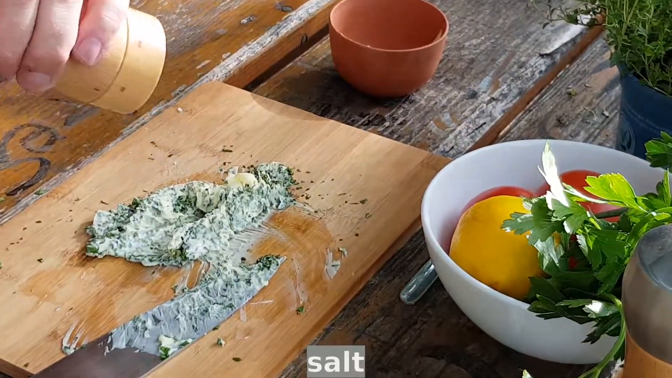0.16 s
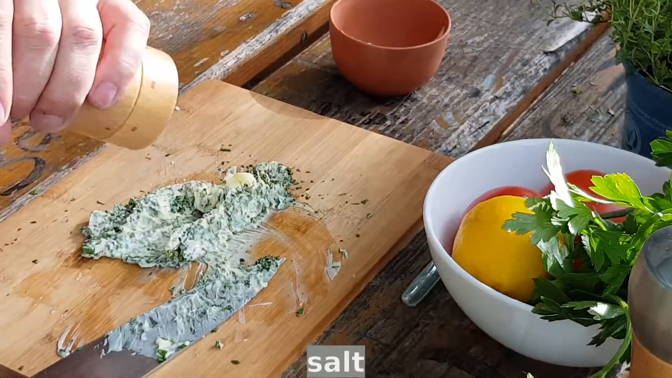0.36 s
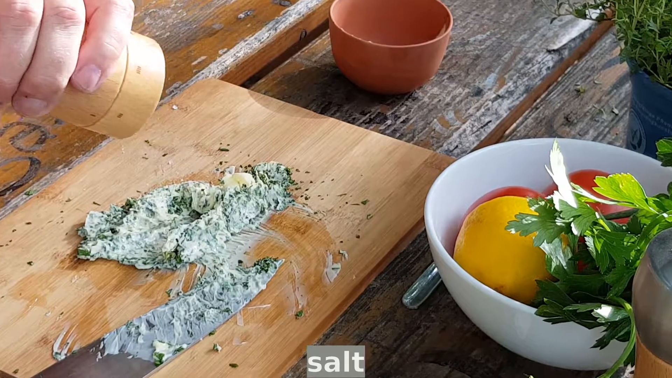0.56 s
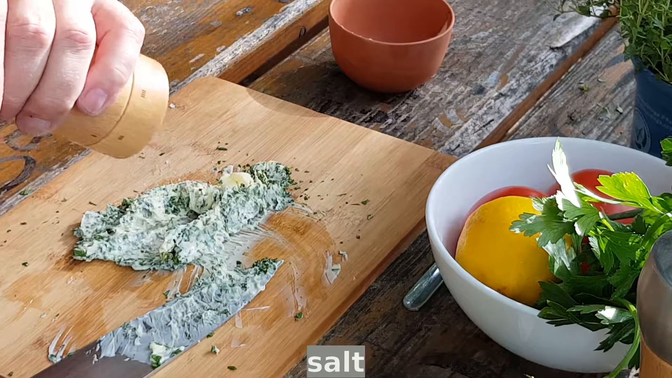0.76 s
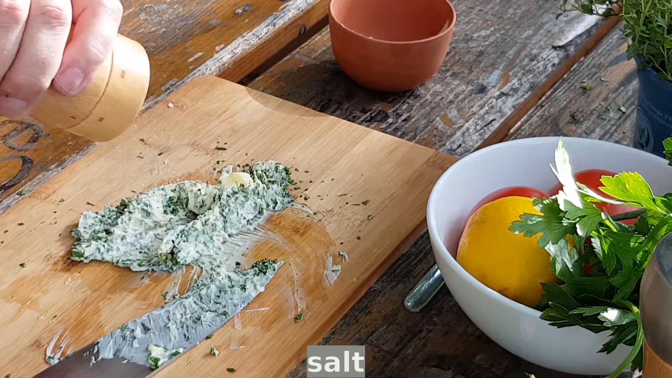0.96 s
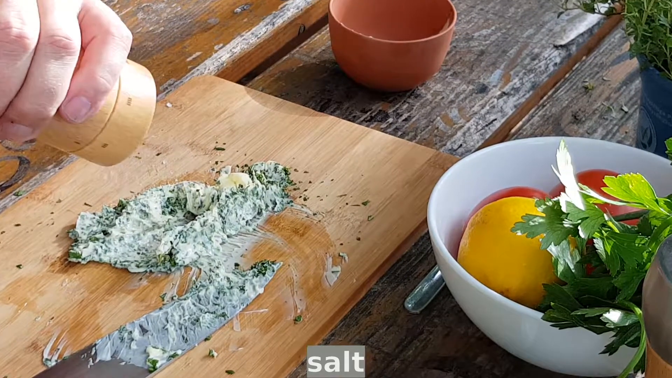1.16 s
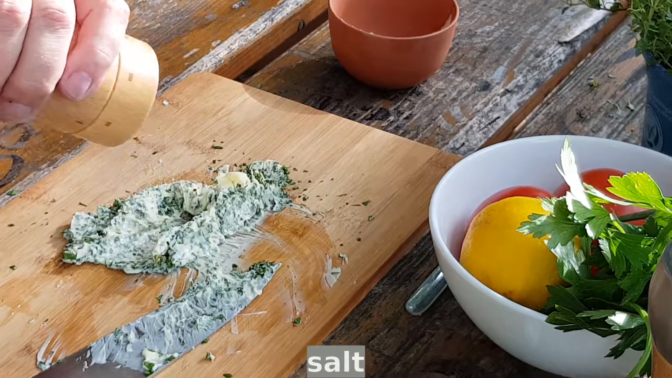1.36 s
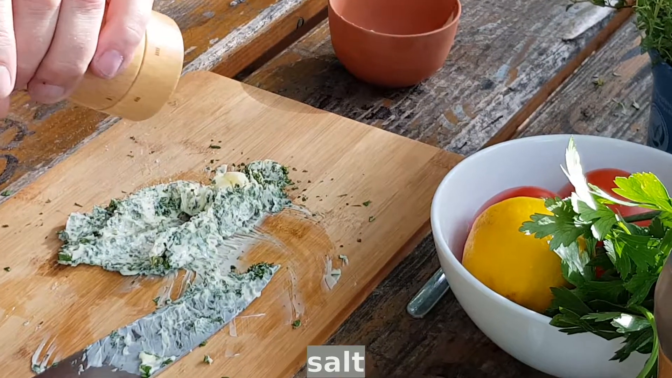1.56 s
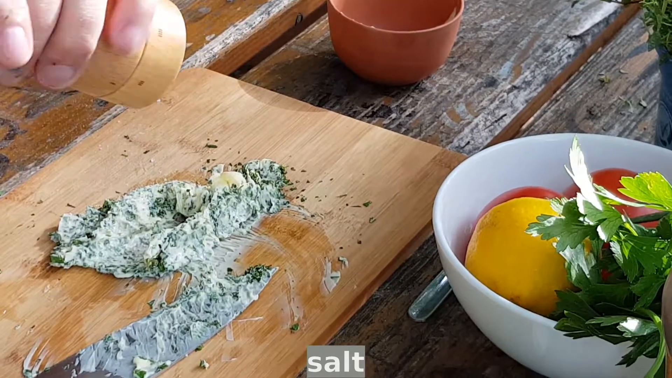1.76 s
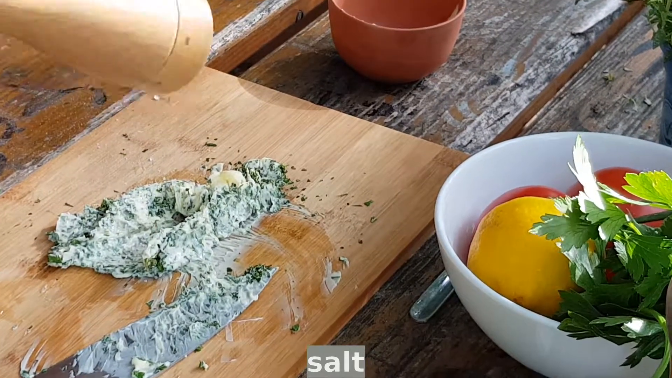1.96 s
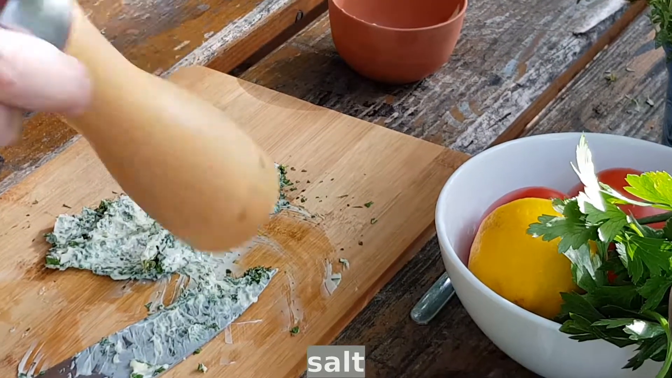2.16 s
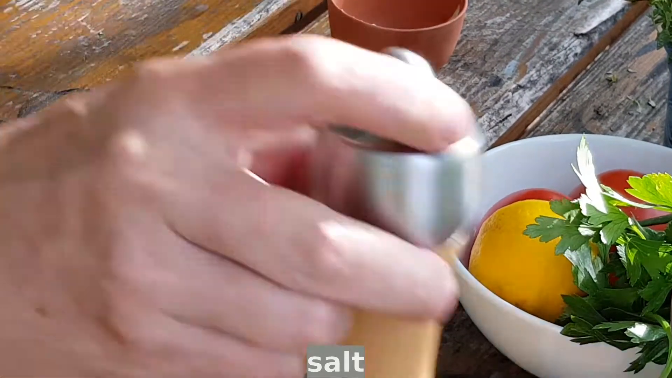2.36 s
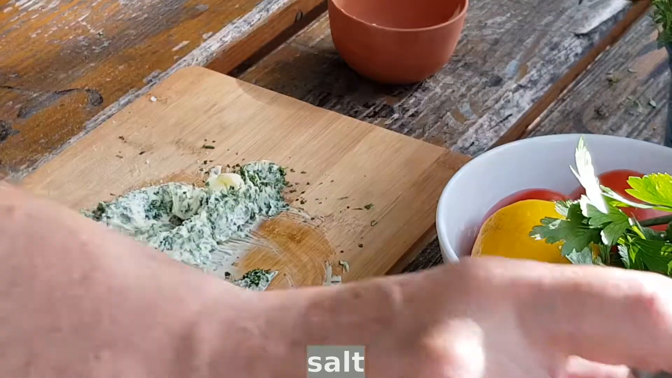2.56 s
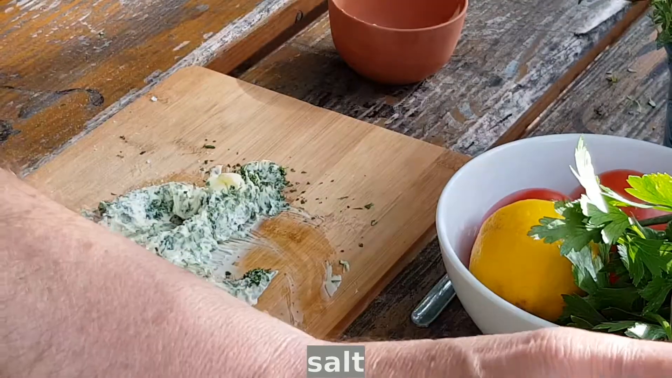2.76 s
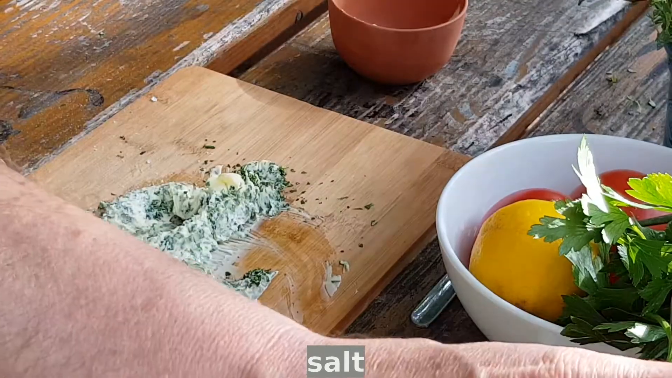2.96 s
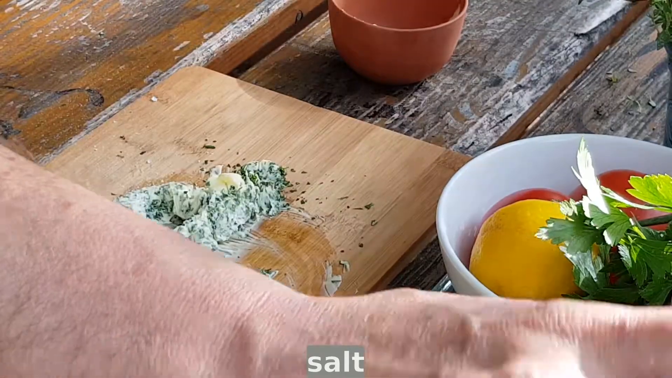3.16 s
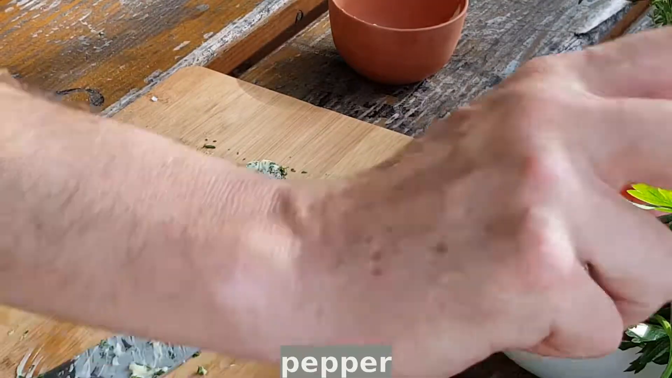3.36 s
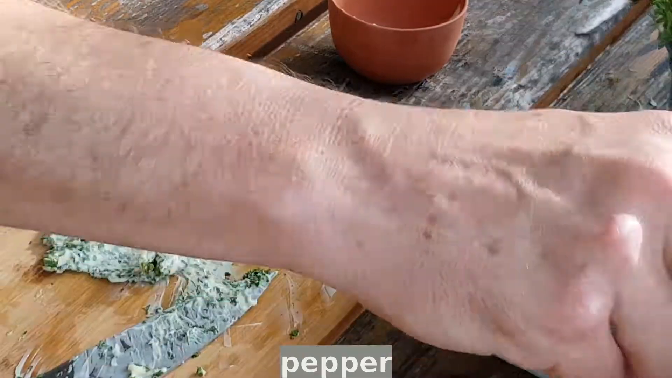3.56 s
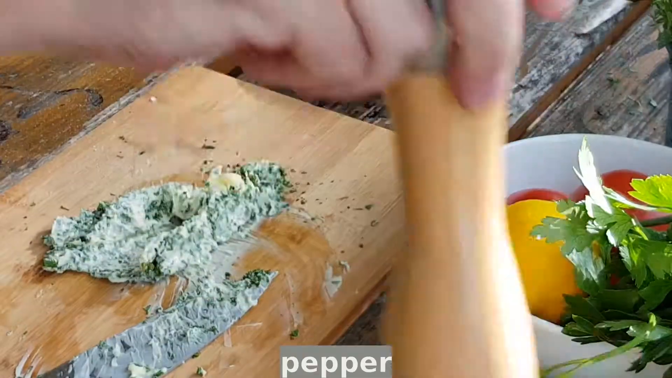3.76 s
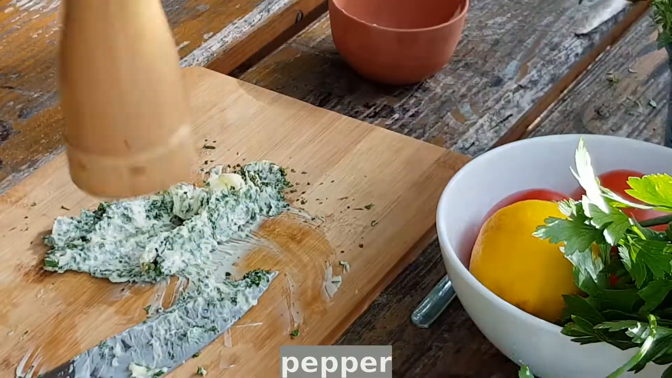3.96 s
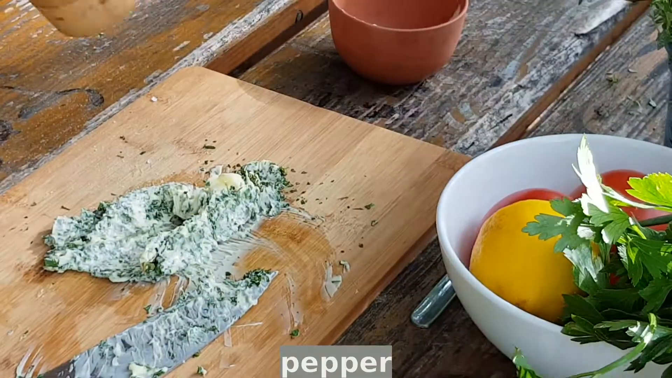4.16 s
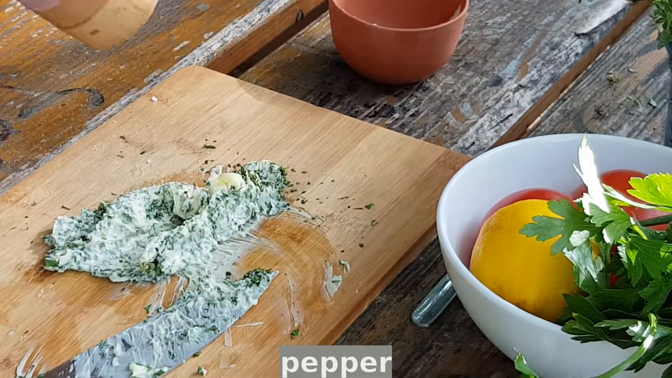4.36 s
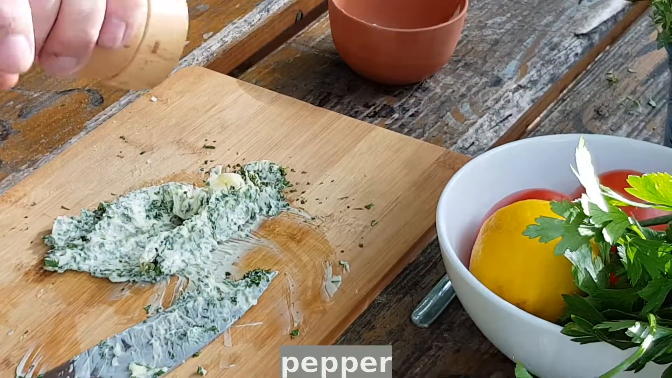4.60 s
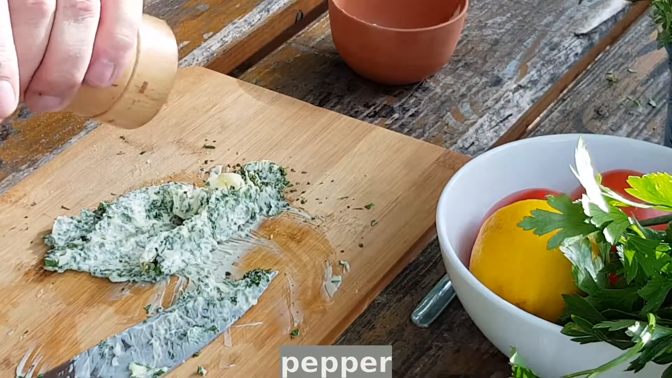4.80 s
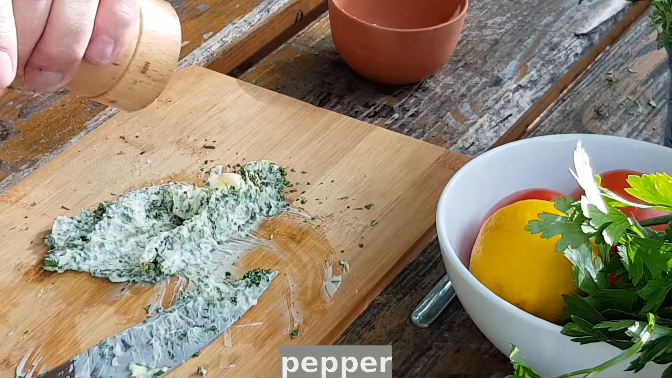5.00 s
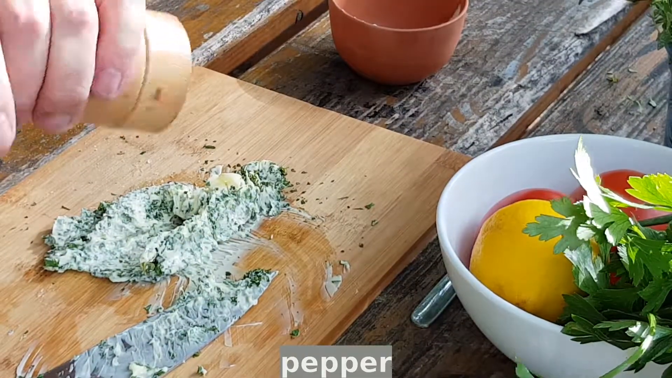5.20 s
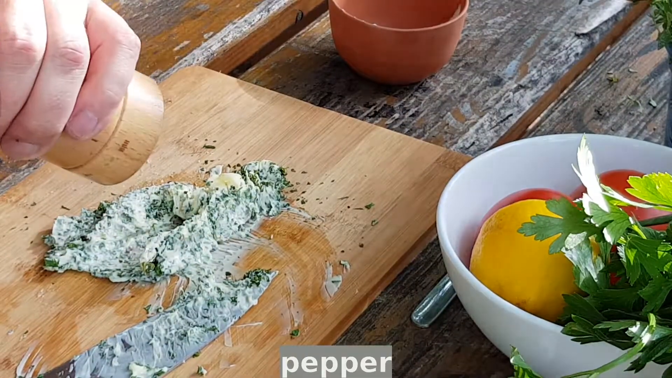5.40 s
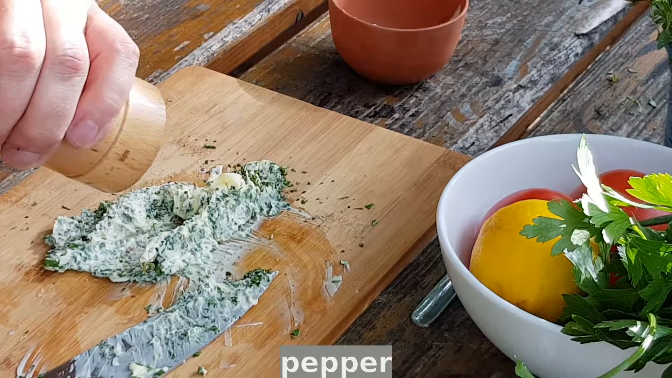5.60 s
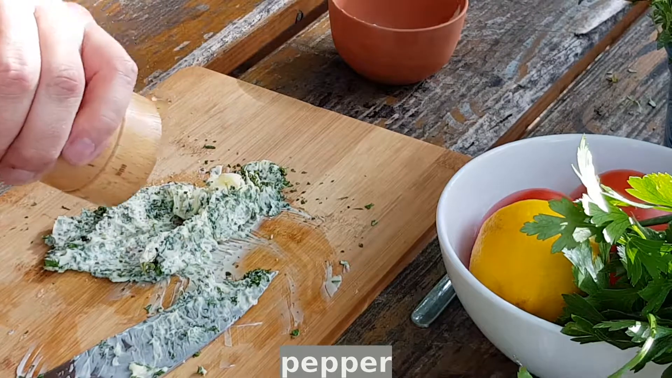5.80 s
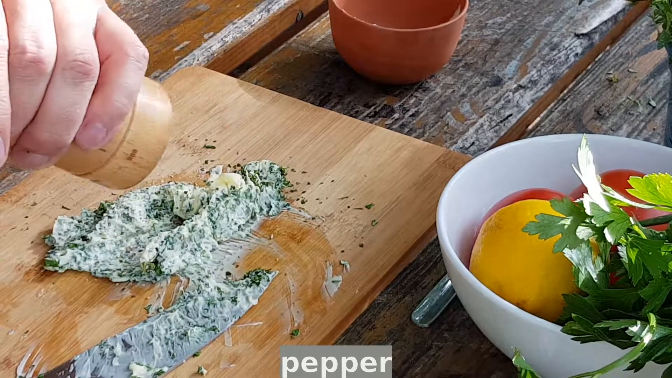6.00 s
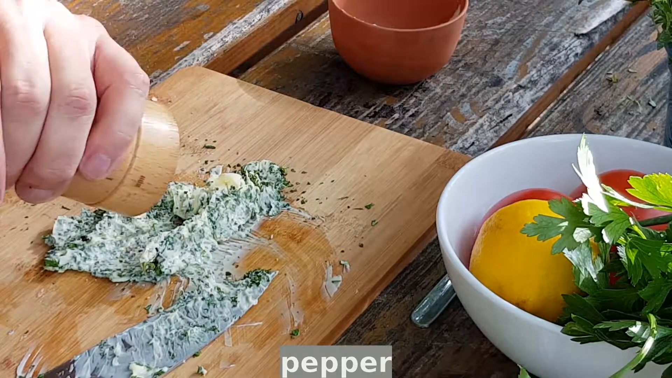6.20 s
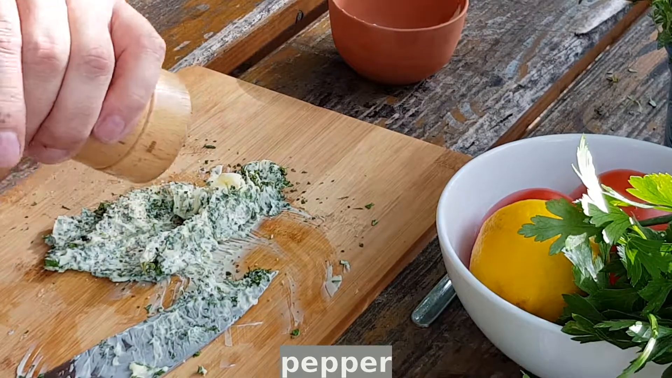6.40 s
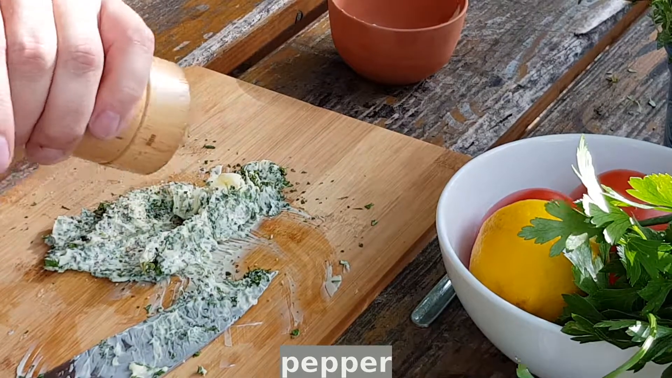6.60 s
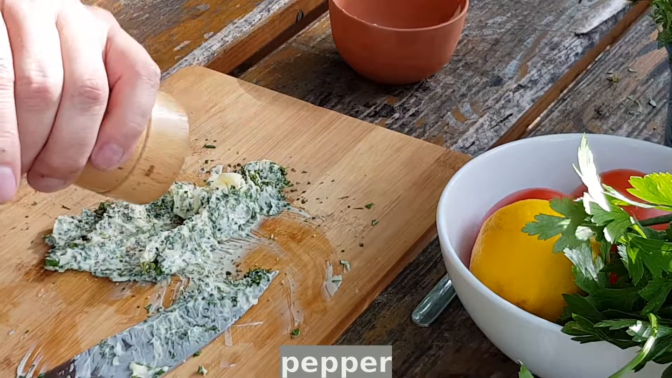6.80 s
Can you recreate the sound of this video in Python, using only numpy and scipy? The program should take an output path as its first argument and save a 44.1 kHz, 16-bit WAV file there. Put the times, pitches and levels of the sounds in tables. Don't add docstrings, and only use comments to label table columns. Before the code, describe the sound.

Close gritty grinding of salt, a wooden thud on a table, light cap ticks, then crackling pepper twists over soft wind and distant traffic.

```python
import sys
import numpy as np
from scipy import signal
from scipy.fft import rfft, irfft, next_fast_len
from scipy.io import wavfile
from scipy.ndimage import map_coordinates

SR = 44100
rng = np.random.default_rng(int(sys.argv[2]) if len(sys.argv) > 2 else 0)


def gain_from_decibels(decibels):
    exponent = np.asarray(decibels, float) / 20
    return 10 ** exponent


def int16_out(signal):
    q = np.round(np.clip(np.atleast_2d(signal).T, -1, 1) * 32767)
    wavfile.write(sys.argv[1], SR, q.astype(np.int16))


N = 302085
CLOCK = np.arange(0, N / SR + .002, .001)

SALT_IN_HAND, PEPPER_IN_HAND = (.05, 1.52), (4.47, 6.8)  # (first [s], last [s])
# (burrs bite [s], hold [s], effort [dB], sag of pressure over the hold [dB])
SALT_TWISTS = [
    (0.162, 0.084, -42, 4.5),
    (0.567, 0.098, -41.5, 10),
    (0.937, 0.12, -43, 5.5),
    (1.314, 0.1, -43, 3),
]
PEPPER_TWISTS = [
    (4.575, 0.07, -42.5, 20),
    (4.641, 0.046, -49.5, 6.5),
    (5.147, 0.086, -40.5, 4.5),
    (5.622, 0.093, -47.5, -5),
    (6.084, 0.067, -48.5, -6.5),
    (6.587, 0.075, -38, 14.5),
]
# (deep [dB over effort], middle [dB], upper body [dB])
SALT_GRIPS = [(0.2, 1.6, 1.5), (2.5, -1, 0.5), (-1, -1.5, 3), (1.5, 0.48, 1)]
PEPPER_GRIPS = [(-1.5, 5.5, 1.5), (3, 17, 10.5), (-3, 0, -1.5), (8.5, 3, -1.5), (9, 2, 4),
                (-2.5, 0.5, -2.5)]
SALT_SAG = (0.78, 0.67, 0.83, 1)
PEPPER_SAG = (0.11, 0.81, 0.83, 0.9)
# (deep [s], middle [s], upper body [s], grit [s])
SWELL_S = (0.0037, 0.001, 0.0052, 0.0016)
# (deep [dB], middle [dB], upper body [dB], grit [dB])
SETTLE_DB = (-16, -11.5, -11, -7)
SALT_WIND_UP, PEPPER_WIND_UP = 620, 650
LET_GO_DB_PER_S, SETTLE_DB_PER_S = 780, 262

# (time [s], grit peak [dB], deep, middle, upper body
# [dB above grit])
SALT_CRACKS = [(0.1135, -56, 2.0, 4, -11), (0.1287, -41, -6, -8, -7), (0.1323, -27.5, -17, -5, -8),
               (0.141, -49, 4, 8, -3), (0.1489, -49.5, 17, 13, 0), (0.1578, -30.0, -5.0, 6, -5),
               (0.1654, -36, 8, -3, -2), (0.1735, -35, 5, 2, -3), (0.1863, -45, 9, 9, 0),
               (0.1916, -38, 8, 2, -6), (0.203, -47, 4.0, 2, -2), (0.212, -47, 4, 3, -5),
               (0.2186, -39.5, 2, 4, 0), (0.2307, -34.5, -13, 3, -3), (0.2575, -40, -11, -7, 3),
               (0.5453, -39, 0, -3, -1), (0.552, -44.0, 6, -6, 7), (0.5752, -20.5, -15, -21, -19),
               (0.585, -44, -7, -3, 7), (0.5955, -40.5, 10, 5, 10), (0.6032, -45, 9, 5, 11),
               (0.608, -51, 12.0, 1, 5), (0.637, -45, 4, 1, 9), (0.658, -55, 4, 23, -3),
               (0.303, -62, 8, 1, 5),
               (0.904, -44, -18, -17, -10), (0.9278, -33, 5, -15, -9), (0.9387, -32.5, 6, -2, -10),
                    (0.9442, -37, 3, -4, 2), (0.955, -32, -9, -1, -3), (0.9607, -32, -12, 1, 0),
                    (0.9749, -25, -2, -2, 10), (0.9865, -44, -13, -4, 1), (0.9992, -37, 1, 0, -3),
                    (1.0075, -38, 3, 4, -1), (1.0106, -45, -4, 0, -1), (1.0188, -34, 4, 3, 4),
                    (1.0333, -39, 11, 11.5, 1), (1.051, -42, 12, 5, 7), (1.289, -42, -3, -12, -8),
                    (1.2958, -50, 0, 0, 0), (1.3085, -33.5, 2, -4, -2), (1.3252, -32.0, -12, -6, -7),
                    (1.3348, -24, -2, -2, 0), (1.3407, -34, 7.5, 5, 2), (1.3577, -33, 0, -2, -2),
                    (1.369, -34, 4, -2, 4), (1.377, -32, 7, 5, 12.5), (1.3897, -27.5, 6, 8.5, 11),
                    (1.4515, -46, 6, 11, -4)]
PEPPER_CRACKS = [(4.561, -59, 4, 3, 2), (4.5742, -30.5, 4, 10, 7), (4.5975, -52, 7.0, 3, 7),
                 (4.6135, -54, 4.0, 7, 4), (4.636, -49, 19, 7, 10), (4.6425, -47, 19.5, 20, 9),
                 (4.658, -45, 7, 23, 6), (4.665, -44, 13, 4, 5), (4.675, -45, 6, 12, 11),
                 (4.686, -49, -3, 1, 9), (4.6922, -45, 1, 2, 13), (4.7076, -50, 6.0, 20, 19),
                 (5.1105, -40.5, -3, 2, 8.5), (5.1394, -44, -2.0, -7, 10), (5.147, -27.5, 1, -8, 6),
                 (5.155, -36, 11, 4, 19.5), (5.1659, -26.5, -0.5, -3, 10), (5.178, -39, 14, 0, 3),
                 (5.191, -27, 2.5, -7, 1), (5.2017, -33, 2, -6, -2), (5.2114, -46, -4, -5, -7),
                 (5.2196, -48, -8, -11, -9), (5.2239, -49, -9, -7, -8), (5.2337, -34, 3.0, -9, -11),
                 (5.605, -40, -10, -10, -10), (5.6177, -44, 6, -11, -12), (5.6315, -22, -15, -16, -18),
                 (5.6464, -22.5, -5, -5, 0), (5.652, -27, -9, -8, 2), (5.665, -29, -1, -8, 2),
                 (5.681, -40, 16, 10, 2), (5.6916, -44, 15, 3, 4), (5.7007, -44.5, 3, -4, 17.5),
                 (5.7086, -55, 8, -1, 1),
                 (6.031, -52, 5, -7, 8), (6.0582, -45.5, 12.5, 7, 2), (6.066, -29.5, -4, -10, 8),
                      (6.076, -47, 16, 4, 9), (6.0863, -50, 11, 3, 20), (6.0981, -23, -17, -13, -5),
                      (6.1096, -21, -6, -15, -12), (6.1184, -45, 14, 0, 6), (6.1293, -26.5, -8, -3, -4),
                      (6.133, -37, -4, -5, 3), (6.1381, -31, -7, 1, 7), (6.1462, -24, -12, 1, 10.5),
                      (6.1552, -25.5, -11, 0, 10.5), (6.161, -39, -2, 2, 16.5), (6.5555, -43, 1.0, -2, 11),
                      (6.5726, -30, -4, -10, -11), (6.5823, -38, -2, 0, 2), (6.5874, -29, -7, -5, 16.5),
                      (6.6, -29, -6, -8, 6), (6.6074, -32, -2, -2, 15), (6.6127, -32.5, 9.5, -5, 7),
                      (6.627, -35, 5, 3, 6), (6.632, -41, -5, 1, 1), (6.6373, -45, 17, -3, 2),
                      (6.6512, -55, 23, 1, 1), (6.657, -59, 20, 3, 4), (6.675, -52, 14, 14, 11)]
MORE_CRACKS = [(0.565, -54, 5, 3, 1), (0.614, -36, 8.5, 3, 5), (5.5885, -48, -3, -10, 5),
               (5.711, -49, 9.5, 4, -3), (5.74, -50, 2, -2, 9)]
# (deep [dB], middle [dB], upper body [dB], grit [dB])
SPLIT_DB = (-6, -3.5, -13, -3.5)
SNAP_DB = 12.5
SPLIT_LEAN = 3
# (frequency [Hz], width [Hz], level [dB])
SALT_BODY = [
    [(653, 260, 0), (702, 92, -5.5), (1118, 105, 3.5)],
    [(1330, 170, 0.5), (1780, 97, 1), (2190, 140, -1)],
    [(2545, 79, -2), (2930, 270, 2.5), (3640, 250, -5)],
    [(4760, 1100, -6.5), (8500, 1300, -3), (11070, 1100, -2), (12400, 1300, -3), (14800, 950, -4)],
]
PEPPER_BODY = [
    [(562, 130, -3), (697, 127, 1.5), (1094, 110, -3), (1325, 81, -4.5)],
    [(1682, 240, -1.5), (2200, 410, -4.5)],
    [(2836, 330, 3.5), (3780, 130, 0), (4240, 160, -1), (5000, 470, -9)],
    [(5700, 1100, -5.5), (8300, 430, -9), (10600, 480, -8), (13600, 1400, -7), (12340, 1300, -3.5), (15300, 920, -11)],
]
# (time [s], upper-body lean [dB/octave], grit lean [dB/octave])
LEAN = [(.11, -5, -2.5), (.6, -11, -0.5), (1.0, 8, -1), (1.4, 6, -1), (4.62, 0.5, 10), (5.19, 2.5, 0),
        (5.66, 5, 3.5), (6.11, -5.5, 0.5), (6.6, 9, -1.5)]

# (time [s], peak [dB])
SET_DOWN = [
    (2.759, -9.5),
]
# (frequency [Hz], level [dB], t60 [s])
TABLE = [(351, -7, 0.11), (376.4, -9.5, 0.18), (411, 6.5, 0.061), (505.5, 1, 0.11), (551, -1, 0.09),
         (632, 15, 0.022), (700, -2.5, 0.12), (750, 8.5, 0.037), (820, 18, 0.0096), (997, -0.5, 0.083),
         (1203, 4.5, 0.052), (1052, -5.5, 0.093), (1370, -8, 0.076), (1566, -10, 0.07)]
# (frequency [Hz], level [dB], t60 [s])
CAP = [(6550, -24, 0.0092), (9370, -14, 0.032), (11100, 6, 0.0063), (11280, -9, 0.025), (12900, -13, 0.045),
       (14400, -14, .015)]

# (time [s], peak [dB], dull part [dB over peak], t60 [s], ring [Hz])
TICKS = [(2.0133, -32.5, -25, 0.0053, 8700), (2.015, -36, -32, 0.029, 750), (2.444, -46, -18, 0.016, 8950),
         (2.9413, -43, -4.5, 0.019, 8500), (3.899, -21.5, -4, 0.012, 11600),
         (3.909, -32, -11, 0.018, 10600), (3.949, -45, -3, 0.015, 9500), (4.0063, -48, 3, 0.02, 10500),
         (4.012, -44, -3, .015, 3780), (4.282, -52, -16, .01, 9000), (4.292, -41.5, -13, 0.014, 11500),
         (4.45, -39.5, 0.5, 0.03, 8500), (4.49, -46, 0, 0.013, 5000), (4.502, -40, -4, 0.015, 7700),
         (4.534, -53, 5, 0.075, 3830), (6.695, -42, -7, 0.023, 5300), (6.7375, -46, -2, .011, 8000)]
# (time [s], hold [s], level [dB], sag [dB])
FINGERS = [(2.018, 0.0071, -71.5, -8), (3.63, 0.12, -67.5, 2), (3.8, .36, -70.5, -7),
           (3.998, 0.04, -62.5, -2), (4.058, 0.05, -59.5, 0), (4.203, 0.1, -70, -1.5),
           (4.792, .03, -66, 0.5)]
# (frequency [Hz], density [dB/Hz])
SKIN = [(1060, -24), (1800, -12), (2160, -7), (3030, -10), (6180, -10), (12400, -8), (16000, -19)]
TOUCH_DB_PER_S, LIFT_DB_PER_S = 300, 140

# (time [s], hold [s], level [dB], sag [dB])
ROLLING = [(4.116, 0.063, -56.5, 12), (4.22, .02, -55, 11), (4.235, 0.293, -59.5, 1), (6.356, 0.01, -54, 2)]
# (frequency [Hz], width [Hz], level [dB])
CHAMBER = [(664, 140, 1), (780, 100, 11.5), (990, 130, -35), (2250, 130, -8.5)]
TUMBLE_DB_PER_S = 900

# (time [s], peak [dB], half length [s], left over right [dB])
GUSTS = [(-0.002, -35, 0.0065, 18), (0.052, -37.5, 0.055, 11), (0.343, -38.5, 0.054, 0),
         (0.477, -45.5, 0.05, 3), (0.58, -38, 0.063, 6), (0.69, -43, 0.043, 25), (0.817, -35.5, 0.044, 4),
         (0.967, -31, 0.081, -1.5), (1.092, -37.5, 0.028, -7), (1.211, -36.5, 0.017, 2),
         (1.677, -43, 0.071, 18), (1.847, -43, 0.092, -4.5), (2.135, -40, 0.075, 14),
         (2.39, -45.5, 0.11, 2), (2.54, -37, 0.014, 3), (2.628, -37.5, 0.034, 5), (2.737, -36, 0.0078, 11),
         (2.825, -31, 0.0092, 11), (3.185, -43, 0.02, -1), (3.294, -44, 0.069, 3), (3.547, -37.5, 0.019, 1),
         (3.672, -36, 0.057, 8), (3.8, -40, 0.024, 2), (4.388, -49, 0.055, 3), (4.705, -49, 0.12, 17),
         (4.908, -38, 0.055, 3.5), (5.705, -40.5, 0.027, 0), (6.114, -45.5, 0.18, 2),
         (6.242, -45, 0.036, 0), (6.661, -34.5, 0.039, -3)]
# (time [s], hold [s], level change [dB])
LEE = [(0.068, 0.045, -39), (0.19, 0.3, -39), (1.721, .015, -24), (1.813, 0.052, -25), (1.953, 0.1, -34),
       (2.123, .13, -33), (2.692, 0.022, -30), (3.12, 0.032, -16), (3.341, 0.1, -27), (3.963, 0.041, -21),
       (4.085, 0.082, -38), (4.703, 0.12, -33)]
# (time [s], share 0-1)
SHARED = [(0, 0), (1.5, 0.39), (3, 0.27), (4.4, 0.36), (5.4, 0.96), (6.85, 0.91)]
# (frequency [Hz], density [dB/Hz])
BUFFET = [(18, -27), (30, -11), (49, -4.5), (69, 0), (182, -14), (316, -24.5), (500, -29.5), (650, -34),
          (1100, -120)]
BREEZE_DB, VEER_DB_PER_S = -52, 700
# (level [dB], frequency [Hz], zero crossing [s], fade [s])
FIRST_SWING = (-22.5, 72, .0023, .0105)

# (start [s], length [s], first pitch [Hz], last pitch [Hz], level [dB])
CHIRPS = [(0.482, .06, 1600, 1600, -74), (0.804, 0.078, 2300, 2200, -74), (0.829, 0.056, 2190, 2280, -66),
          (1.925, 0.1, 2090, 1760, -73), (1.974, 0.035, 1610, 1545, -68), (2.04, 0.14, 1800, 1780, -80),
          (2.262, 0.11, 1315, 1446, -64), (2.31, 0.12, 1840, 1820, -79), (4.309, 0.136, 2230, 2270, -77)]
# (time [s], level [dB])
TRAFFIC = [(0, -67), (1.6, -67), (2.8, -61), (3.2, -62.5), (4, -60.5), (6.85, -55)]
# (frequency [Hz], density [dB/Hz])
ROAD = [(110, -21), (260, -6.5), (500, -8.5), (1120, -6), (1300, -11), (1800, -17), (1980, -31),
        (3500, -38.5), (4550, -33), (7700, -120)]
# (frequency [Hz], density [dB/Hz])
DRONE = [(120, -35), (270, -3), (450, -3), (800, -45)]
# (frequency [Hz], density [dB/Hz])
HISS = [(150, -35), (880, -8.5), (1500, -0.5), (2600, -7), (3570, -9), (4030, -7.5), (15200, -8.5),
        (16300, -11)]
HISS_DB = -69.5
TOP_HZ = 15850


def mill(in_hand, levels_db, cracks, body, per_s, spread_db, t60, crack_db, knock_db, lead_s, grit_lead_s):
    hits = np.zeros((4, N))
    for s, db, deep_db, middle_db, upper_db in cracks:
        parts_db = [deep_db + knock_db, middle_db + knock_db, upper_db + knock_db, crack_db]
        hits[:, round(s * SR)] = gain_from_decibels(db + np.add(SPLIT_DB, parts_db))
    turning = slice(round(in_hand[0] * SR), round(in_hand[1] * SR))
    hits = hits[:, turning]
    n = hits.shape[1]
    crumbling = [dying(hit, share * t60) for hit, share in zip(hits, (0.63, 0.29, 0.6, 0.88))]
    felt_by_all = grains(per_s, spread_db, size=n)
    leans = [0, 0, *curves(LEAN + [(N / SR, *LEAN[-1][1:])], rest=0)[:, turning]]
    alikes = (0.89, 0.53, 0.47, 0.27)

    direct = np.zeros((4, N))
    scattered = np.zeros((2, N))
    for i, modes in enumerate(body):
        level_db = levels_db[i, turning]
        centre_hz = np.mean([row[0] for row in modes])
        for hz, width_hz, db in modes:
            crush = dying(.8 * felt_by_all + grains(per_s, spread_db, size=n), t60)
            crush = unit(crush + .22)
            gain = gain_from_decibels(db + leans[i] * np.log2(hz / centre_hz))
            grip = gain_from_decibels(2.3 * wobble(25, size=n))
            sharp = 1.0
            if modes is body[-1]:
                sharp = gain_from_decibels(SPLIT_LEAN * np.log2(min(hz / 11000, (12500 / hz) ** 2)))
            push = gain * grip * (gain_from_decibels(level_db - 5.5) * crush + sharp * crumbling[i])
            snap = gain * sharp * gain_from_decibels(SNAP_DB) * hits[i] * rng.choice([-1, 1])
            common, own = twin_noise(alikes[i], size=n)
            direct[i, turning] += mode(push * common + snap, hz, width_hz)
            scattered[:, turning] += mode(push * own, hz, width_hz)
    wood = ports(direct[:3].sum(axis=0), lead_s, pan_db=1.0)
    grit = ports(direct[3], grit_lead_s, pan_db=2.5)
    return wood + grit + scattered


def twisting(twists, grips, sags, wind_up):
    levels_db = []
    for part, share in enumerate(sags):
        strokes = []
        for (s, hold_s, db, sag_db), grip in zip(twists, grips):
            start, held = s + SWELL_S[part], hold_s - SWELL_S[part]
            part_db = db + (*grip, 0)[part]
            part_sag_db = share * sag_db
            strokes.append(stroke(start, held, part_db, part_sag_db, wind_up, LET_GO_DB_PER_S))
            rest_db = part_db - part_sag_db + SETTLE_DB[part]
            strokes.append(stroke(start + held, 0.012, rest_db, 0, LET_GO_DB_PER_S, SETTLE_DB_PER_S))
        levels_db.append(loudest(strokes))
    return np.array(levels_db)


def set_down():
    (s, db), = SET_DOWN
    out, at = np.zeros((2, N)), round(s * SR)
    out[:, at:at + SR // 4] = gain_from_decibels(db - 10.5) * ringing(TABLE, attack_s=0.0025)
    out[:, at + 30:at + 30 + SR // 4] += gain_from_decibels(db - 6.5) * ringing(CAP, attack_s=0.00046)
    blow = np.zeros(N)
    blow[at + 20] = 1
    crack = gain_from_decibels(db - 9.0) * dying(blow, 0.011) + gain_from_decibels(db - 30.0) * dying(blow, 0.21)
    common, own = twin_noise(0.62)
    out += coloured(crack * (common + own), [(250, -38), (500, -1), (1300, -13), (2000, 7), (3100, 2),
                                             (4100, -11.0), (5300, -2), (9000, -6.5), (16000, 4)])
    shift_s = 5e-5 * np.array([[-1], [1]])

    def path(hz):
        low_cut = hz ** 4 / (hz ** 4 + 170.0 ** 4)
        return np.exp(2j * np.pi * hz * shift_s) * low_cut

    return filtered(out, path) * gain_from_decibels([[.8], [-.8]])


def handling():
    t = np.arange(2048) / SR
    high, low = np.zeros((2, N))
    ring = np.zeros((2, N))
    for s, db, dull_db, t60, hz in TICKS:
        fall = gain_from_decibels(db - 4.5 - 60 * t / max(t60, .003))
        at = round(s * SR)
        span = slice(at, at + 2048)
        high[span] += fall * (hz / 10000) ** 2
        low[span] += gain_from_decibels(dull_db) * fall
        common, own = twin_noise(0.22, size=2048)
        ring[:, span] += gain_from_decibels(-3.5) * mode(fall * (common + own), hz, 0.13 * hz)
    common, own = twin_noise(0.068)
    bright = gain_from_decibels(-9.0) * coloured(high * (common + own), [(4000, -16), (6000, -25.0), (8500, 3.0),
                                                          (11000, 4.0), (16000, 2.0)])
    common, own = twin_noise(0.015)
    dull = coloured(low * (common + own), [(500, -38), (800, -4.0), (3000, -5.5), (5000, -7.5), (7000, -42)])

    stutter = unit(dying(grains(per_s=120, spread_db=-1), t60=0.055) + 1)
    slide_db = loudest([stroke(*row, TOUCH_DB_PER_S, LIFT_DB_PER_S) for row in FINGERS])
    skin = coloured(rng.standard_normal((2, N)), SKIN)
    slide = gain_from_decibels(slide_db + 3.5 + wobble(54)) * stutter * skin
    return ring + bright + dull + slide


def rolling():
    level_db = loudest([stroke(*row, TUMBLE_DB_PER_S, TUMBLE_DB_PER_S) for row in ROLLING])
    taps = gain_from_decibels(level_db - 10.0) * unit(dying(grains(per_s=450, spread_db=5.5), t60=0.035) + 0.65)
    common, own = twin_noise(0.99)
    out = np.zeros((2, N))
    for hz, width_hz, db in CHAMBER:
        knock = mode(taps * (common + own), hz, 3 * width_hz)
        out += gain_from_decibels(db) * mode(knock, hz, width_hz) * np.sqrt(width_hz / SR * 9)
    return out


def wind():
    power = gain_from_decibels(2 * BREEZE_DB)
    for s, db, half_s, pan_db in GUSTS:
        share = 1 / (1 + gain_from_decibels([[-2 * pan_db], [2 * pan_db]]))
        power = power + gain_from_decibels(2 * db) * share * np.exp(-2 * ((CLOCK - s) / half_s) ** 2)
    left_db, right_db = (loudest([10 * np.log10(port)]) for port in power)
    lee_db = loudest([stroke(s, hold_s, -db, 0, VEER_DB_PER_S, VEER_DB_PER_S) for s, hold_s, db in LEE])
    common, own = twin_noise(curves(SHARED)[0])
    port_lumps_db = np.array([2.4 * wobble(28), 3.8 * np.tanh(2 * wobble(24))])
    lumps = gain_from_decibels(1.6 * wobble(35) + port_lumps_db)
    lumps = lumps / np.sqrt(np.mean(lumps ** 2, 1, keepdims=True))
    reach = gain_from_decibels([left_db, right_db - np.maximum(lee_db, 0)])
    return coloured(reach * lumps * (common + own), BUFFET)


def first_swing():
    db, hz, zero_s, fade_s = FIRST_SWING
    t = np.arange(N) / SR
    swing = np.sin(2 * np.pi * hz * (t - zero_s)) * np.exp(-(t / fade_s) ** 4)
    return gain_from_decibels(db - np.array([[0], [25]])) * swing


def birds():
    out = np.zeros(N)
    for s, length, first_hz, last_hz, db in CHIRPS:
        n = round(length * SR)
        pitch = np.linspace(first_hz, last_hz, n) + 22 * wobble(60, size=n)
        level = gain_from_decibels(db + 1.5 + 1.3 * wobble(55, size=n)) * np.hanning(n) ** 0.32
        out[round(s * SR):][:n] += level * np.sin(2 * np.pi * np.cumsum(pitch) / SR)
    return ports(out, lead_s=-0.000059, pan_db=-2)


def traffic():
    common, own = twin_noise(0.87)
    road = coloured(ports(common, lead_s=-0.00031, pan_db=0.5) + own, ROAD)
    return gain_from_decibels(curves(TRAFFIC)[0] + 3.0 + wobble(19) + wobble(5)) * road


def town_drone():
    return gain_from_decibels(-50.5 + wobble(5)) * coloured(rng.standard_normal((2, N)), DRONE) / 10


def microphone_hiss():
    hiss = coloured(rng.standard_normal((2, N)), HISS) * gain_from_decibels([[1], [-1]])
    return gain_from_decibels(HISS_DB + 5 + 0.5 * wobble(4.07)) * hiss


def grains(per_s, spread_db, size=N):
    moment, luck = rng.random((2, size))
    return (moment < per_s / SR) * gain_from_decibels(-spread_db * np.log(luck + 1e-9))


def dying(train, t60):
    return signal.lfilter([1], [1, -gain_from_decibels(-60 / (t60 * SR))], train)


def mode(x, hz, width_hz):
    b, a = signal.iirpeak(hz, hz / width_hz, SR)
    return signal.lfilter(b, a, x) * np.sqrt(SR / (np.pi * width_hz))


def ringing(modes, attack_s):
    t = np.arange(SR // 4) / SR
    tones = []
    for hz, db, t60 in modes:
        drift = .04 * np.cumsum(rng.standard_normal(len(t)))
        tones.append(-gain_from_decibels(db - 60 * t / t60) * np.sin(2 * np.pi * hz * t + drift))
    strengths = gain_from_decibels(rng.normal(size=(2, len(modes))))
    return strengths @ np.array(tones) * (1 - np.exp(-t / attack_s))


def stroke(s, hold_s, db, sag_db, rise, fall):
    t = CLOCK - s
    sag = sag_db * np.clip(t / hold_s, 0, 1)
    return db - sag + rise * np.minimum(t, 0) - fall * np.maximum(t - hold_s, 0)


def loudest(levels_db):
    return np.interp(np.arange(N) / SR, CLOCK, np.max(levels_db, axis=0))


def curves(rows, rest=-120):
    s, *columns = np.transpose(rows)
    out = np.full((len(columns), N), float(rest))
    span = np.arange(round(s[0] * SR), min(round(s[-1] * SR) + 1, N))
    out[:, span] = [np.interp(span / SR, s, column) for column in columns]
    return out


def wobble(rate, size=N):
    knots = rng.standard_normal(int(size * rate / SR) + 4)
    return map_coordinates(knots, [np.arange(size) * rate / SR], order=2)


def twin_noise(alike, size=N):
    alike = np.clip(alike, 0, 1)
    common = np.sqrt(alike) * rng.standard_normal(size)
    own = np.sqrt(1 - alike) * rng.standard_normal((2, size))
    return common, own


def ports(x, lead_s, pan_db):
    half = np.array([[.5], [-.5]])
    return filtered(x, lambda hz: np.exp(2j * np.pi * hz * lead_s * half)) * gain_from_decibels(pan_db * half)


def coloured(x, spectrum):
    f, v = np.transpose(spectrum)
    return filtered(x, lambda hz: unit(gain_from_decibels(np.interp(np.log(hz + 1), np.log(f + 1), v))))


def filtered(x, response):
    m = next_fast_len(N + 8192)
    return irfft(rfft(x, m) * response(np.fft.rfftfreq(m, 1 / SR)), m)[..., :N]


def unit(x):
    return x / np.sqrt(np.mean(x ** 2) + 1e-20)


def scene():
    salt = mill(SALT_IN_HAND, twisting(SALT_TWISTS, SALT_GRIPS, SALT_SAG, SALT_WIND_UP),
                SALT_CRACKS + MORE_CRACKS, SALT_BODY,
                per_s=440, spread_db=0.0, t60=0.033, crack_db=-7.5, knock_db=-5.5,
                lead_s=0.00014, grit_lead_s=.000085)
    pepper = mill(PEPPER_IN_HAND, twisting(PEPPER_TWISTS, PEPPER_GRIPS, PEPPER_SAG, PEPPER_WIND_UP),
                  PEPPER_CRACKS + MORE_CRACKS, PEPPER_BODY,
                  per_s=390, spread_db=3.0, t60=0.026, crack_db=-5.5, knock_db=-5.0,
                  lead_s=0.00012, grit_lead_s=.000068)
    table = salt + pepper + set_down() + handling() + rolling()
    air = wind() + first_swing()
    distance = birds() + traffic() + town_drone()
    return table + air + distance + microphone_hiss()


def top_cut(x):
    return signal.sosfilt(signal.butter(12, 16810, fs=SR, output="sos"), x)


def record(dry):
    mix = filtered(dry, lambda hz: 1 / (1 + (hz / TOP_HZ) ** 150))
    return top_cut(mix)


dry = scene()
out = record(dry)
int16_out(out)
```